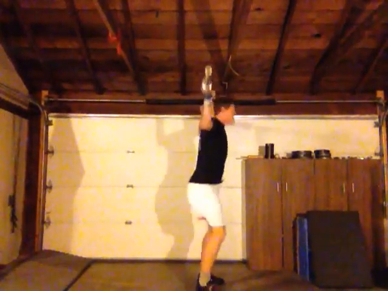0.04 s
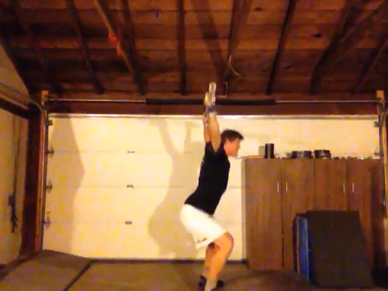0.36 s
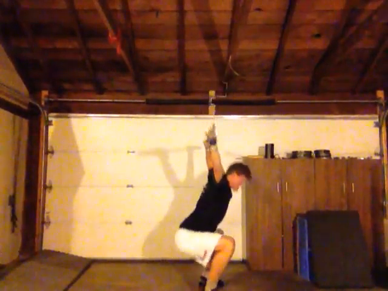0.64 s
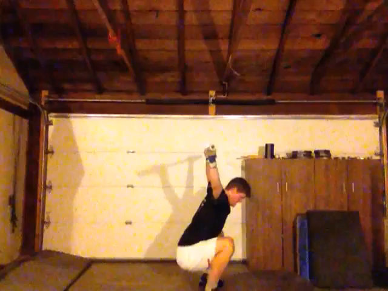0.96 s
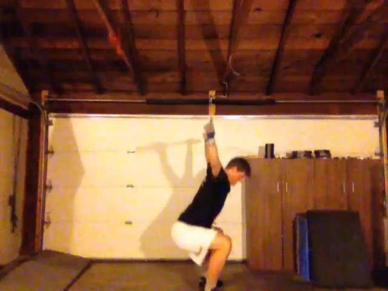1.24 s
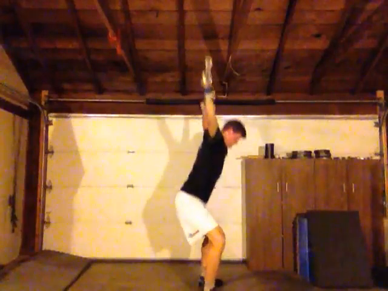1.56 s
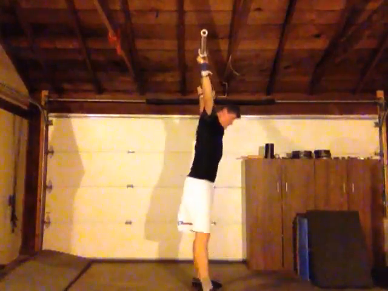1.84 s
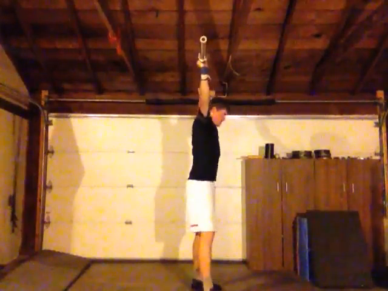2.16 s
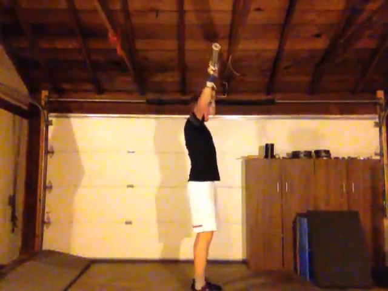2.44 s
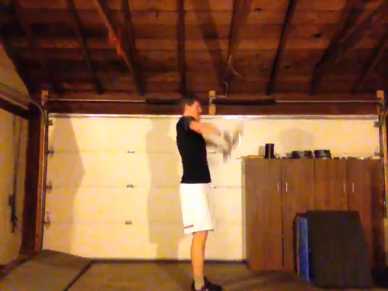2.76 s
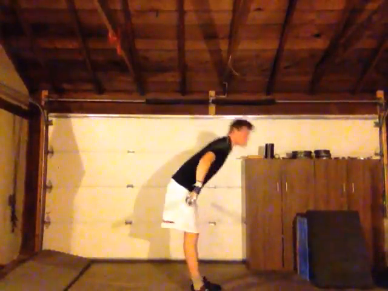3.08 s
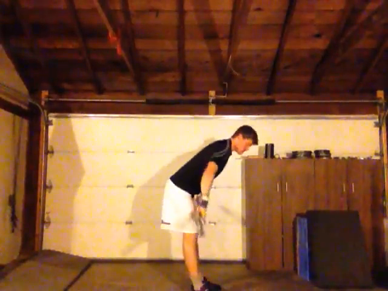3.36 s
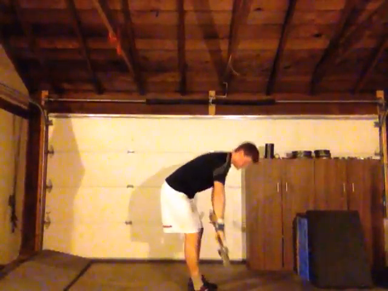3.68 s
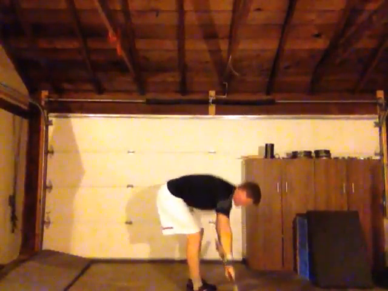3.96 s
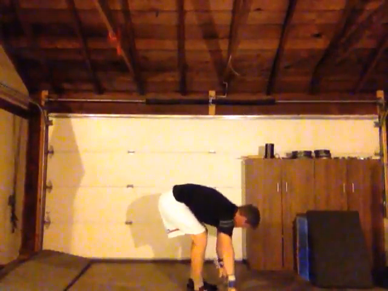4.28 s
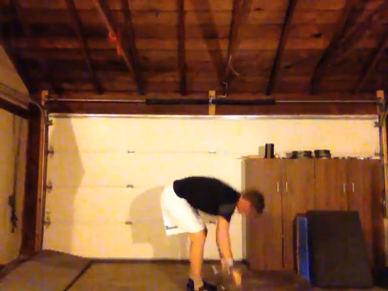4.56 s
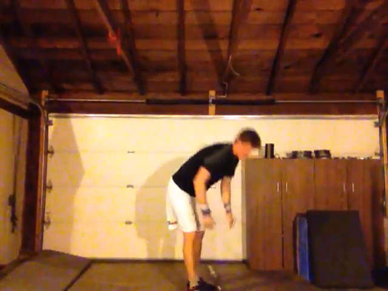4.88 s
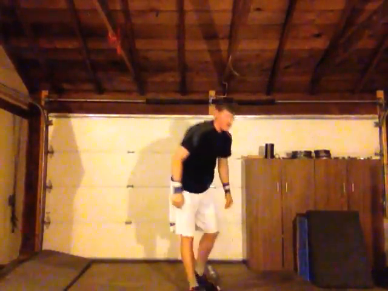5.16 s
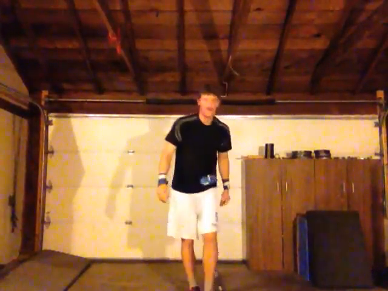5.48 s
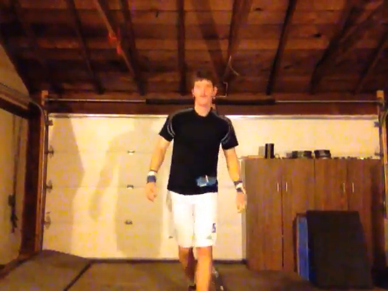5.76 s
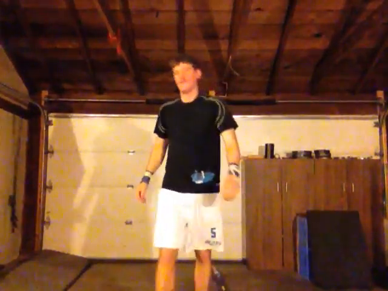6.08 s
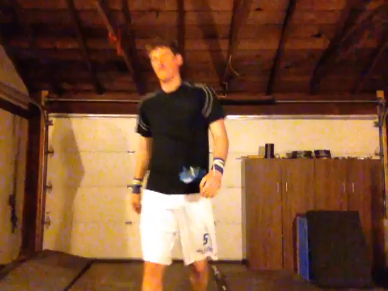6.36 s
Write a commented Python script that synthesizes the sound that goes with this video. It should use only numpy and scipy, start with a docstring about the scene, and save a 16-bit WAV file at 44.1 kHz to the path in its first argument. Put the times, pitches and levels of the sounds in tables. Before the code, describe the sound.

A muffled engine hums outside a garage throughout, over faint hiss. It revs up and down twice, peaking near 2.7 and 4.6 seconds. At about 0.2 seconds, feet stamp sharply on floor mats, and at 0.4 seconds the loose ends of a barbell give a short metallic rattle. A very faint, brief, high whistle comes at 1.8 seconds, followed by a soft, dull knock of shifting weight. Clothes swish from around 2.4 seconds, and the bar rattles again at 2.8 seconds as it is lowered. Another dull knock comes near 3.8 seconds. At 4.5 seconds the bare steel bar hits the floor with a thud, by far the loudest sound. It bounces, chatters and rings with a short room echo, dying away soon after 5 seconds. Two soft steps follow near 5.8 seconds, and the hum continues to the end at about 6.4 seconds.

```python
"""A barbell snatch in a garage. Throughout, over faint hiss, an engine outside hums through the door
and revs up and down twice. At 0.2 s the lifter's feet stamp and the bar's sleeves rattle; at 1.8 s
comes a brief, faint, high whistle. Clothes swish, his weight shifts with dull knocks, and the sleeves
rattle again at 2.8 s as the bar comes down. At 4.5 s the bare steel bar hits the floor with a thud,
bounces, chatters and rings in its bending modes. Two soft steps follow near 5.8 s."""
import sys
import numpy as np
from scipy import signal
from scipy.fft import rfft, irfft
from scipy.io import wavfile

SR = 44100
rng = np.random.default_rng(int(sys.argv[2]) if len(sys.argv) > 2 else 0)


def wav_record(signal):
    """Record a signal, one row per channel, as 16-bit PCM in the file named by sys.argv[1]."""
    frames = np.transpose(np.atleast_2d(signal))
    bounded = np.clip(frames, -1, 1)
    # unit amplitude maps onto the largest positive 16-bit level
    quanta = np.round(bounded * 32767).astype(np.int16)
    wavfile.write(sys.argv[1], SR, quanta)


N = 283563
TIME_S = np.arange(N) / SR

# Noise spectra. Each row: frequency in Hz, relative density in dB.
HISS_SPECTRUM = [(25, 0), (100, 8), (500, 21), (1500, 9.5), (3500, -1), (8000, -3.5), (15000, -5)]
EXHAUST_SPECTRUM = [(30, -45), (70, -15), (130, -8), (220, 4.5), (330, -2.5), (430, -4), (540, -10),
                    (700, -12.5), (1050, -22.5), (1900, -32), (3000, -43), (6000, -59.5)]
CLOTH_SPECTRUM = [(300, -9), (1200, 0), (2200, 0.5), (3500, -0.5), (5500, 1), (8000, 2), (11000, -2),
                  (15000, 2)]
KNOCK_SPECTRUM = [(120, -20), (300, -3), (550, 1), (850, 1), (1250, -10), (2200, -19), (3200, -29),
                  (6000, -42)]
SOLE_SPECTRUM = [(40, -28), (100, -17), (170, 3.5), (260, 4.5), (450, -3), (700, -0.5), (1200, -5.5),
                 (1900, -12), (3000, -21), (6000, -26.5), (10000, -36), (15000, -40.5)]
SLEEVE_SPECTRUM = [(200, -53), (900, -5), (1450, 4), (2300, -0.5), (4000, 1.5), (5500, -3), (8000, -7.5),
                   (11000, -19), (15000, -19)]
CLANK_SPECTRUM = [(30, -46.5), (80, -38.5), (150, -10), (240, 0.5), (450, 1.5), (900, -3), (1400, 1.5),
                  (2500, 1), (4200, -3.5), (6600, 1.5), (8500, -7.5), (11000, -6.5), (15000, -10.5)]
CRACK_SPECTRUM = [(2000, -30.5), (5000, -12), (6700, -2), (8500, -6), (11000, 0.5), (13000, 0), (15000, -2)]

# Engine speed. Each row: time in seconds, cycle rate in Hz.
ENGINE_SPEED = [(0.0, 21.1), (0.11, 20.28), (0.45, 20.14), (1.29, 21.64), (1.93, 26.4), (2.51, 33.09),
                (2.72, 34.14), (2.85, 33.44), (3.02, 29.71), (3.11, 27.1), (3.24, 25.69), (3.6, 25.68),
                (3.94, 27.17), (4.44, 30.33), (4.78, 30.72), (5.32, 24.07), (5.57, 23.45), (6.43, 25.24)]
# Load, high on throttle. Each row: time in seconds, exhaust level in dB.
ENGINE_LOAD = [(0, -52), (.2, -48.5), (1.3, -42), (2.3, -36.5), (2.66, -36.5), (2.93, -46.5), (3.22, -49.5),
               (3.42, -44), (3.85, -40.5), (4.48, -37.5), (4.7, -51), (5.2, -53.5), (5.6, -47.5),
               (6.43, -49.5)]
# Unsteady firing. Each row: time in seconds, roughness from 0 to 1.
ENGINE_ROUGHNESS = [(1.28, .2), (1.45, 1), (2.7, 1), (3.3, .55), (4.1, .9), (5.6, .55)]
# Low drone, before door and room. Each row: time in seconds, level in dB.
DRONE_LEVEL = [(0, -50), (.35, -39.5), (1.2, -39), (1.9, -43.5), (2.25, -39), (2.55, -35.5), (3.03, -43),
               (3.15, -54), (3.4, -41), (3.8, -39.5), (4.15, -42.5), (4.45, -40), (4.7, -52), (5.1, -57),
               (5.55, -47.5), (6.43, -45.5)]
# Drone orders; uneven firing favours odd ones. Each row: order, dB relative to the drone level.
DRONE_ORDERS = [(4, -12), (5, -3.5), (6, -14), (7, -4.5), (8, -12), (9, -3), (11, -8)]
# Weaker orders. Each row: order, dB relative to the exhaust level.
UPPER_ORDERS = [(10, -7), (12, -6), (13, -14.5), (14, -5.5), (15, -14), (16, -4.5), (17, -8), (19, -7.5),
                (20, -4.5)]
# Path through door and walls. Each row: frequency in Hz, gain in dB.
DOOR_GAIN = [(40, -22), (80, 1), (100, -11), (112, -8.5), (130, 0.5), (165, -0.5), (195, -1), (300, -1.5),
             (430, -0.5), (475, -6.5), (700, -11)]
# Low garage modes. Each row: centre in Hz, width in Hz, lift in dB.
ROOM_MODES = [(150.5, 5.5, 8.5), (184.5, 6.5, 12), (211, 4, 6), (221.5, 3.5, 6), (231, 6, 4.5)]

# Clothes and hands brushing. Each row: peak time in seconds, level in dB, rise and fall in seconds.
SWISHES = [(1.145, -59.5, 0.025, 0.028), (2.389, -36, 0.0065, 0.038), (2.778, -45.5, 0.14, 0.19),
           (3.35, -58, 0.12, 0.19), (3.53, -59, 0.098, 0.15), (3.8, -55, 0.056, 0.18),
           (4.501, -56, 0.054, .05), (5.255, -56, 0.034, 0.024), (5.735, -53.5, .006, 0.098)]
# Knocks on the mats. Each row: start in seconds, relative level in dB.
MAT_KNOCKS = [(1.948, -38), (1.972, -32.5), (3.824, -28.5), (4.512, -18)]
# Shoes on the mats. Each row: start in seconds, relative level in dB, T60 in seconds.
STEPS = [(.225, -9, .035), (.239, -8.5, .04), (.248, -7, .04), (.259, -11, .03), (5.733, -43, .04),
         (5.84, -46, .06)]
# Bending modes of the bar. Each row: frequency in Hz, relative level in dB.
BAR_MODES = [(899, -10), (1195, 1), (1530, -6), (1914, -2), (2239, -2), (2570, 1), (2911, 0), (3275, -4),
             (3690, -2), (4066, -3), (4488, -4), (4935, -1.5), (5400, -2), (5850, 2), (6325, -1),
             (6474, -3), (6812, 0), (7343, -2), (7855, -3), (8420, -5), (8948, -6), (9495, -2), (10074, -7),
             (10660, -4), (11225, -3), (11862, -6), (12460, -5), (13100, -8), (13710, -6), (14340, -7)]
# Sleeve knocks in the held bar. Each row: start in seconds, level in dB, low-mode drive offset in dB.
RATTLES = [(.387, -34, -9), (.396, -29.5, -6), (.407, -36, -12), (2.803, -40.5, 6), (2.818, -35, 1),
           (2.833, -38, -9), (2.862, -39.5, -8)]
# Floor strike and bounces. Each row: start in seconds, level in dB.
BOUNCES = [(4.514, -26), (4.521, -5.5), (4.528, -4.5), (4.537, -15), (4.548, -9), (4.559, -14.5),
           (4.596, -10), (4.637, -11), (4.67, -8.5), (4.696, -17.5)]


def amp(db):
    """Decibels to gain."""
    return 10 ** (np.asarray(db) / 20)


def unit_rms(x):
    """Scale to rms 1."""
    return x / np.sqrt(np.mean(x ** 2))


def unit_energy(x):
    """Scale a response to preserve white-noise power."""
    return x / np.sqrt(np.sum(x ** 2))


def curve(rows):
    """Linear interpolation of (time, value) rows."""
    return np.interp(TIME_S, *np.transpose(rows))


def fade(t, t60_s):
    """Exponential decay from t = 0, silent before."""
    return (t >= 0) * np.exp(-np.log(1000) * np.maximum(t, 0) / t60_s)


def colour(x, spectrum, taps=4096):
    """Shape x with a minimum-phase filter of the given spectrum."""
    hz, db = np.transpose(spectrum)
    grid_hz = np.maximum(np.arange(taps // 2 + 1) * SR / taps, 1)
    gain = amp(np.interp(np.log(grid_hz), np.log(hz), db))
    cepstrum = irfft(np.log(gain))
    cepstrum[1:taps // 2] *= 2
    cepstrum[taps // 2 + 1:] = 0
    response = unit_energy(irfft(np.exp(rfft(cepstrum))))
    return signal.fftconvolve(x, response)[:N]


def noise(spectrum):
    """Coloured noise, rms 1."""
    return unit_rms(colour(rng.standard_normal(N), spectrum))


def band_noise(hz, width_hz):
    """Noise passed twice through one resonator, rms 1."""
    b, a = signal.iirpeak(hz, hz / width_hz, fs=SR)
    once = signal.lfilter(b, a, rng.standard_normal(N))
    return unit_rms(signal.lfilter(b, a, once))


def wander(rate_hz):
    """Random drift, spread near 1."""
    knots = rng.standard_normal(N // 100)
    return np.interp(TIME_S * rate_hz, np.arange(len(knots)), knots)


def contact_power(rows, t60_s):
    """Summed power of decaying (start, level) contacts."""
    return sum((amp(db) * fade(TIME_S - start_s, t60_s)) ** 2 for start_s, db in rows)


def ring_envelope(power, t60_s):
    """Amplitude of a body that stores incoming power and leaks it."""
    retained = np.exp(-2 * np.log(1000) / (t60_s * SR))
    return np.sqrt(signal.lfilter([1 - retained], [1, -retained], power + 1e-18))


def hiss(level_db=-56, dip_db=-4, dip_at_s=5.45, dip_width_s=0.57):
    """Faint hiss with one smooth dip."""
    dip = np.exp(-((TIME_S - dip_at_s) / dip_width_s) ** 2)
    return amp(level_db + dip_db * dip) * noise(HISS_SPECTRUM)


def garage(x, tail_db=0.5, build_s=0.0017, split_hz=3000, low_t60_s=0.51, high_t60_s=0.25):
    """Direct sound plus dense reflections off door, walls and rafters; treble dies first."""
    t = TIME_S[:SR]
    scatter = rng.standard_normal(SR)
    low = signal.sosfilt(signal.butter(1, split_hz, fs=SR, output="sos"), scatter)
    tail = low * fade(t, low_t60_s) + (scatter - low) * fade(t, high_t60_s)
    tail *= 1 - np.exp(-t / build_s)
    response = amp(tail_db) * unit_energy(tail)
    response[0] += 1
    return signal.fftconvolve(x, unit_energy(response))[:N]


def door_and_room_gain(hz):
    """A tone passes the door and booms where it meets a room mode."""
    lift_db = sum(db * np.exp(-((hz - mode_hz) / width_hz) ** 2) for mode_hz, width_hz, db in ROOM_MODES)
    return amp(np.interp(hz, *np.transpose(DOOR_GAIN)) + lift_db)


def engine(speed_drift=0.004, flutter_db=3.0, jitter_rad=0.097, throb_depth=0.2):
    """Orders sweep the room modes; exhaust roar and a whirr grow with load and throb twice a cycle."""
    cycle_hz, load_db, roughness = curve(ENGINE_SPEED), curve(ENGINE_LOAD), curve(ENGINE_ROUGHNESS)
    unsteady_hz = cycle_hz * (1 + speed_drift * roughness * wander(14))
    phase = 2 * np.pi * np.cumsum(unsteady_hz) / SR
    hum = 0
    for orders, level_db in (DRONE_ORDERS, curve(DRONE_LEVEL)), (UPPER_ORDERS, load_db):
        for order, db in orders:
            rms = amp(level_db + db + flutter_db * roughness * wander(16))
            rms *= door_and_room_gain(order * cycle_hz)
            order_phase = order * (phase + jitter_rad * roughness * wander(22))
            hum += np.sqrt(2) * rms * np.sin(order_phase + 2 * np.pi * rng.random())
    full_load_db = load_db.max()
    roar_db = full_load_db + 1 + 1.1 * (load_db - full_load_db)
    whirr_db = full_load_db - 19.5 + 1.5 * (load_db - full_load_db)
    roar = amp(roar_db) * noise(EXHAUST_SPECTRUM)
    whirr = amp(whirr_db) * band_noise(hz=1380, width_hz=320)
    return hum + (roar + whirr) * (1 + throb_depth * np.sin(2 * phase))


def faint_whistle(at_s=1.8, width_s=0.035, level_db=-66):
    """A brief, faint, high whistle near 8 kHz."""
    swell = np.exp(-((TIME_S - at_s) / width_s) ** 2)
    return amp(level_db) * swell * band_noise(hz=8150, width_hz=900)


def clothes(grain_db=1.5):
    """Fabric slides in grainy swishes."""
    swell = 0
    for peak_s, db, rise_s, fall_s in SWISHES:
        t = TIME_S - peak_s
        swell += amp(db) * np.exp(-2 * np.where(t < 0, (t / rise_s) ** 2, t / fall_s))
    return swell * noise(CLOTH_SPECTRUM) * amp(grain_db * wander(250))


def mat_knocks(gain_db=-1.5):
    """Weight shifts, then one bar end touches down; the mats dull each knock."""
    envelope = np.sqrt(contact_power(MAT_KNOCKS, t60_s=0.0688))
    return amp(gain_db) * colour(envelope * rng.standard_normal(N), KNOCK_SPECTRUM)


def feet(gain_db=-3):
    """Heels and soles slap the mats."""
    envelope = sum(amp(db + gain_db) * fade(TIME_S - start_s, t60_s) for start_s, db, t60_s in STEPS)
    return colour(envelope * rng.standard_normal(N), SOLE_SPECTRUM)


def floor_thud(at_s=4.5235, push_s=0.0015, push_db=-9, push_cutoff_hz=170, slam_db=-20,
               boom_hz=241, boom_db=-22):
    """The landing gives the floor one short push, with a slam and a low ring."""
    t = TIME_S - at_s
    pulse = amp(push_db) * np.sin(np.pi * np.clip(t / push_s, 0, 1))
    push = signal.sosfilt(signal.butter(1, push_cutoff_hz, "high", fs=SR, output="sos"), pulse)
    slam = amp(slam_db) * band_noise(hz=400, width_hz=200) * fade(t, t60_s=0.22)
    boom = amp(boom_db) * np.sin(2 * np.pi * boom_hz * t) * fade(t, t60_s=1.0)
    return push + slam + boom


def bar_ring(tilt_db_per_octave=0, spread_hz=24):
    """Shaft and sleeves split each bending mode into a cluster of beating partials."""
    grid_hz = np.fft.rfftfreq(N, 1 / SR)
    clusters = 0
    for hz, db in BAR_MODES:
        tilt_db = tilt_db_per_octave * np.log2(hz / BAR_MODES[0][0])
        clusters += amp(db + tilt_db) * np.exp(-((grid_hz - hz) / spread_hz) ** 2)
    return unit_rms(irfft(clusters * rfft(rng.standard_normal(N)), N))


def held_bar(ring_db=-2, ring_t60_s=0.3, low_mode_db=-6):
    """Sleeves knock at the catch and on the way down; hands dull the ring, one low mode stands out."""
    power = contact_power([(start_s, db) for start_s, db, _ in RATTLES], t60_s=0.069)
    low_power = contact_power([(start_s, db + drive_db) for start_s, db, drive_db in RATTLES], t60_s=0.09)
    ring = amp(ring_db) * ring_envelope(power, ring_t60_s) * bar_ring(tilt_db_per_octave=-2.5)
    low_tone = np.sin(2 * np.pi * BAR_MODES[1][0] * TIME_S)
    low_mode = amp(low_mode_db) * ring_envelope(low_power, ring_t60_s) * low_tone
    knocks = np.sqrt(power) * noise(SLEEVE_SPECTRUM)
    return garage(knocks) + ring + low_mode


def sleeve_chatter(start_s=4.52, hold_s=0.2, level_db=-19.5, sag_db_per_s=11, contacts_per_s=700):
    """Power of loose sleeves in random contact: sags while the bar bounces, then dies fast."""
    contacts = (rng.random(N) < contacts_per_s / SR) * SR / contacts_per_s
    t = TIME_S - start_s
    release = fade(np.maximum(t - hold_s, 0), t60_s=0.14)
    strength = (t > 0) * amp(level_db - sag_db_per_s * t) * release
    return ring_envelope(contacts * strength ** 2, t60_s=0.024) ** 2


def dropped_bar(crack_db=-10, ring_db=-3.6, ring_t60_s=0.37):
    """Bounces and chatter clank and feed the ring; steel cracks on steel at each bounce."""
    power = contact_power(BOUNCES, t60_s=0.049) + sleeve_chatter()
    crack = amp(crack_db) * np.sqrt(contact_power(BOUNCES, t60_s=0.08)) * noise(CRACK_SPECTRUM)
    clank = np.sqrt(power) * noise(CLANK_SPECTRUM)
    impacts = garage(clank + crack)
    ring = amp(ring_db) * ring_envelope(power, ring_t60_s) * bar_ring()
    return impacts + ring


def scene(bar_cutoff_hz=170):
    """Mono mix of lifter, bar, floor, engine and hiss."""
    lifter = garage(feet() + mat_knocks() + clothes() + faint_whistle())
    # the bar's sounds carry almost no bass
    highpass = signal.butter(3, bar_cutoff_hz, "high", fs=SR, output="sos")
    bar = signal.sosfilt(highpass, held_bar() + dropped_bar())
    return (lifter + bar + floor_thud() + engine() + hiss())[None]


def record(dry, ceiling=1.1, cutoff_hz=15350):
    """The microphone rounds the peaks; a steep low-pass cuts the top."""
    rounded = ceiling * np.tanh(dry / ceiling)
    return signal.sosfilt(signal.ellip(10, .2, 70, cutoff_hz, fs=SR, output="sos"), rounded)


dry = scene()
out = record(dry)
wav_record(out)
```